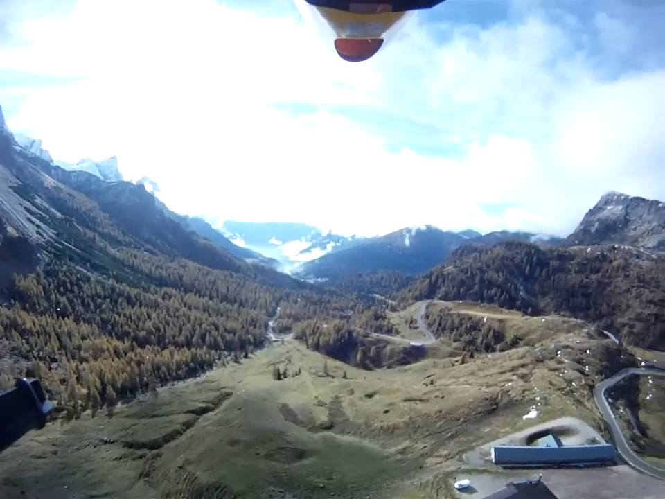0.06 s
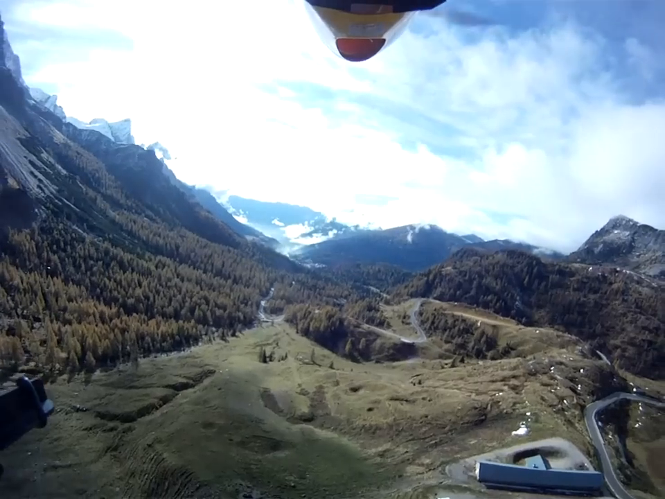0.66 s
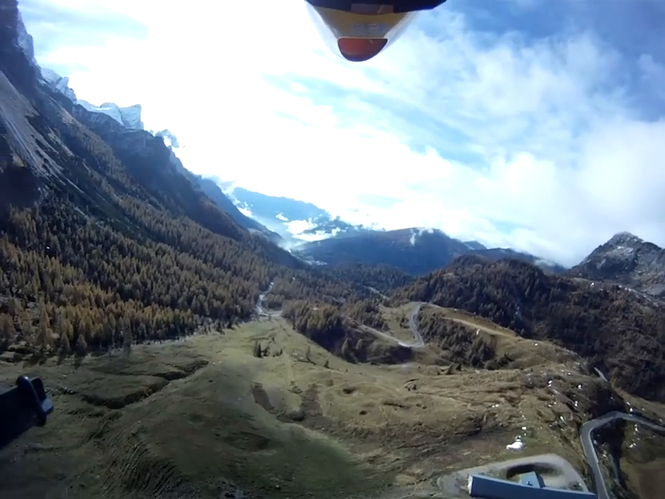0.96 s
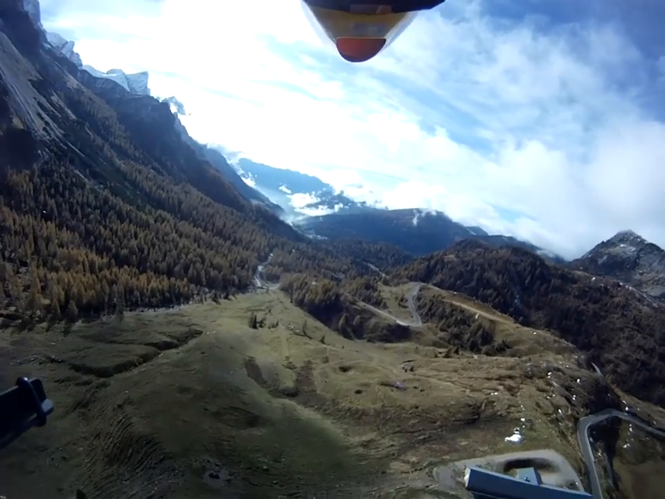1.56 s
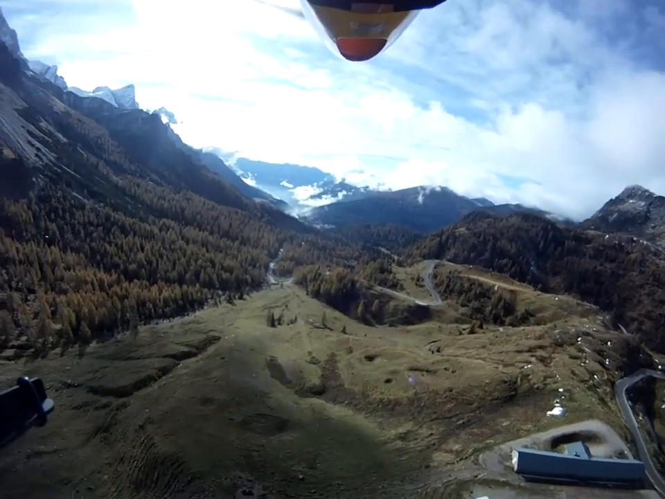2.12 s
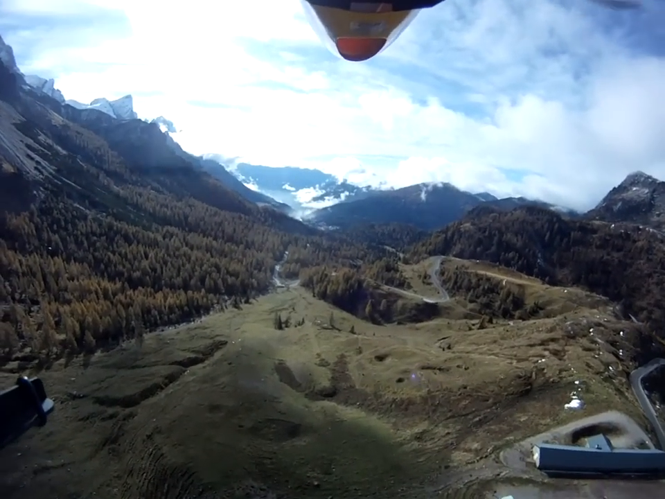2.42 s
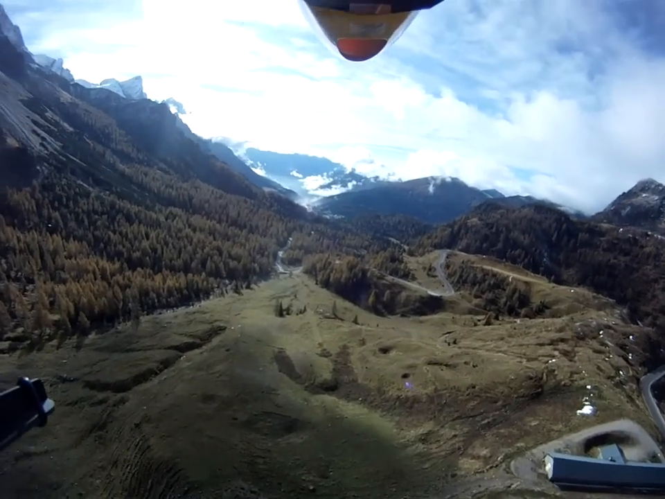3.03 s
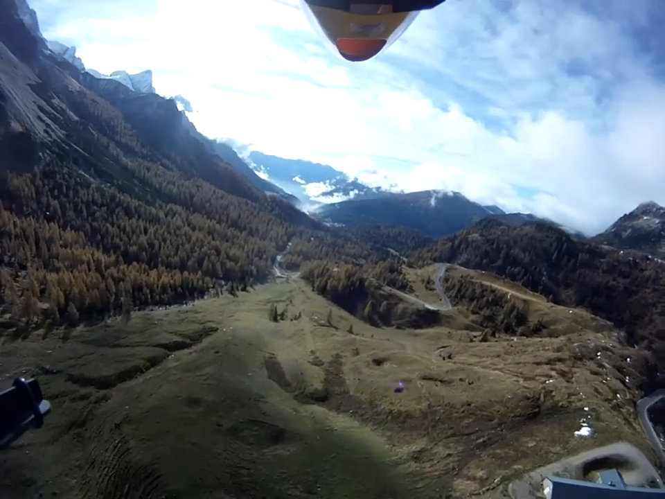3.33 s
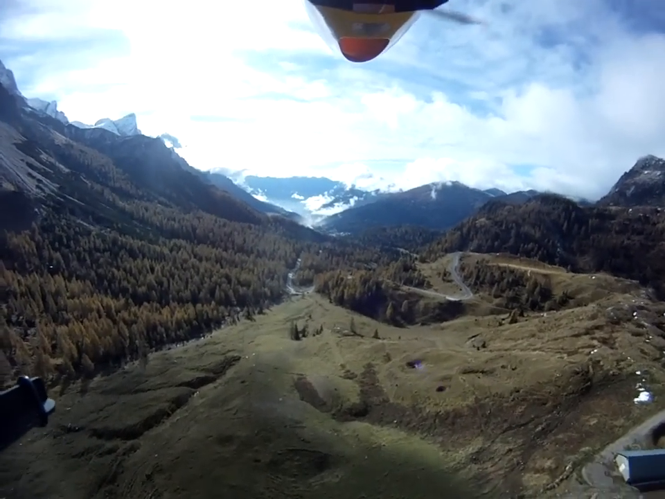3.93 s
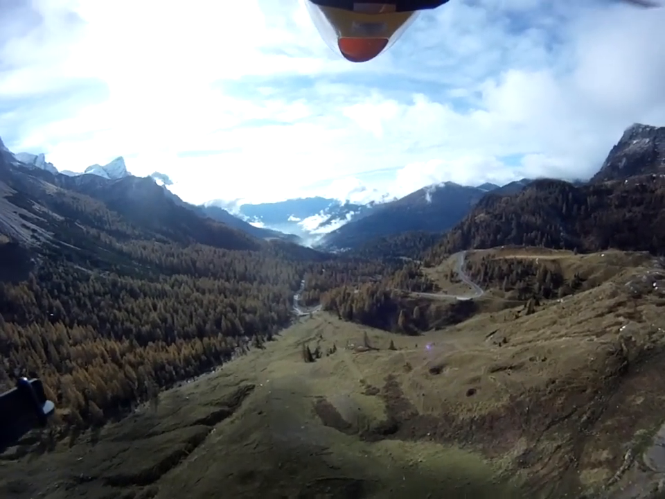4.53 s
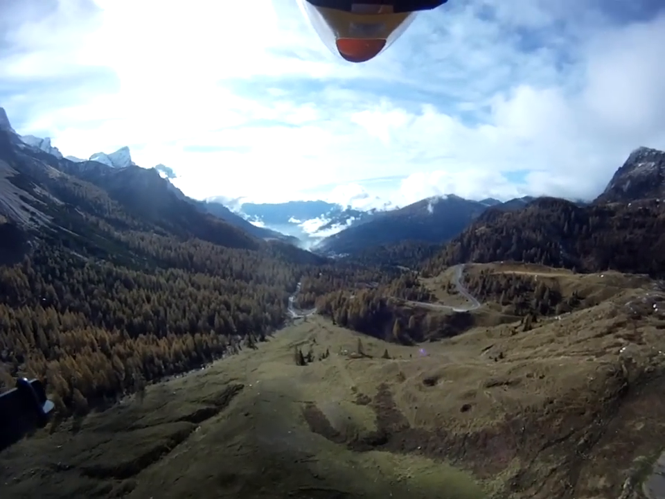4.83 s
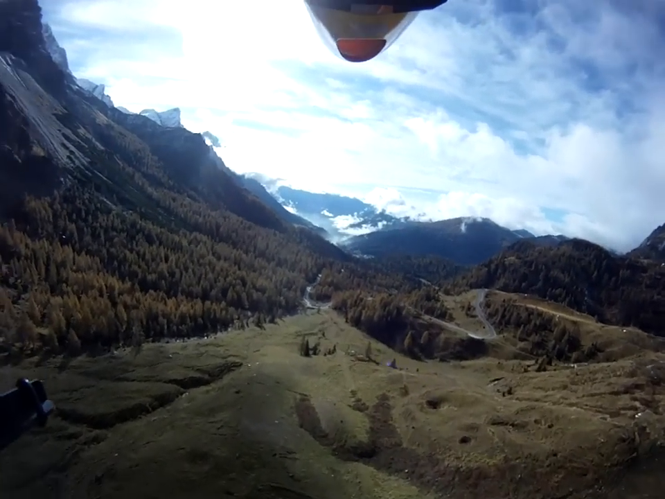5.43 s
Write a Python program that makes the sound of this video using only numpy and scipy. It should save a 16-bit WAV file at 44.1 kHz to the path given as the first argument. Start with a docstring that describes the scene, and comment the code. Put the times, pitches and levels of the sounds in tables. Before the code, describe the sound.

A model helicopter is in flight, heard very close from a small microphone mounted on its body, with no echo. From the first moment its two-stroke engine gives a loud, continuous buzz with a whining edge and a coarse exhaust rasp. Softer blade swish hisses around it, with a faint low rumble of rotor wash and a slight tail rotor drone, clearest around 1 second. The rasp is hardest near 0.75 seconds, then eases a little. The engine's pitch sags gradually by two to three semitones over the first 3.5 seconds, then holds nearly level. From about 2 seconds on, the main rotor shakes the buzz, giving it a fast, even flutter that stays. A thin, high fizz lies over everything throughout. The engine is still running at much the same loudness when the sound ends at about 5.7 seconds.

```python
"""A model helicopter in flight, heard from the microphone of a small camera on its own frame.
From the start the two-stroke engine buzzes close by, with exhaust rasp, blade swish and rotor wash around it.
It sags from 239 to about 207 turns a second; from two seconds on, the geared main rotor shakes the buzz.
Throughout, the camera's coarse sampling adds a thin fizz on top."""
import sys
import numpy as np
from scipy import signal
from scipy.fft import rfft, irfft
from scipy.io import wavfile

SR = 44100
rng = np.random.default_rng(int(sys.argv[2]) if len(sys.argv) > 2 else 0)


def wav_out(sig):
    """Save sig, one row per channel (or a flat mono array), as 16-bit PCM at SR to the path in sys.argv[1]."""
    wavfile.write(sys.argv[1], SR, np.round(np.clip(np.atleast_2d(sig).T, -1, 1) * 32767).astype(np.int16))


N = 250044
TIME, BINS = np.arange(N) / SR, np.fft.rfftfreq(N, 1 / SR)

# engine speed, one firing per turn: time_s, firing_hz
ENGINE_SPEED = [(0.0, 238.9), (0.35, 235.7), (0.55, 232.3), (1.0, 226.8), (1.4, 222.4), (1.95, 216.2),
                (2.25, 211.5), (2.5, 210.7), (2.9, 209.7), (3.3, 207.6), (3.55, 205.9), (4.05, 205.8),
                (4.35, 206.5), (5.0, 207.3), (5.67, 206.5)]


def exhaust_note(turns, fundamental_db=-15, overtone_trim_db=-0.33, smear=.37, flutter=.11):
    """The firing pulses buzz as twelve engine orders; each rotor turn sways their strength and timing."""
    firing_hz = curve(ENGINE_SPEED)
    gains = [gain_of(fundamental_db)]
    gains += [gain_of(overtone_trim_db) * exhaust_resonance(order * firing_hz) for order in range(2, 13)]
    sway = rotor_shake(turns, firing_hz)
    jitter_turns = .003 * drift(35)  # ignition comes a little early or late
    buzz = np.zeros(N)
    for order, gain in enumerate(gains, 1):
        # turbulent air blurs the higher orders most
        blur = 1 + flutter * min(order / 5, 1) * (drift(45) + 1j * drift(45))
        shaken = 1 + (sway if order == 1 else 0.53 * sway * np.exp(1j * order * 1.44))
        phase = order * (turns + jitter_turns) - smear * order ** 2 / 2  # the muffler smears each pulse
        buzz += gain * (blur * shaken * np.exp(2j * np.pi * phase)).real
    return np.sqrt(2) * buzz


def exhaust_resonance(hz):
    """Gain of muffler and tuned pipe at this frequency: their resonances add in power."""
    # muffler resonances that the low orders slide through: centre_hz, half_width_hz, level_db
    muffler = [(408, 36, -37.6), (477, 14, -37.5), (622, 42, -34.7), (716, 22, -35.5), (838, 34, -27.5),
               (869, 30, -22.2), (953, 15, -25.5), (1053, 35, -23.8), (1122, 24, -24), (1163, 25, -20),
               (1197, 14, -27)]
    # tuned pipe resonances that make the high orders whine: centre_hz, half_width_hz, level_db
    pipe = [(1234, 22, -33.5), (1362, 24, -31), (1428, 18, -31), (1465, 34, -26.5), (1590, 24, -28),
            (1688, 38, -21.3), (1745, 28, -26), (1803, 30, -23.3), (1855, 22, -35), (1965, 45, -30.5),
            (2150, 400, -39.5)]
    grid_hz = np.arange(6000.)
    power = sum(gain_of(db) ** 2 / (1 + ((grid_hz - centre) / width) ** 2) ** 3
                for centre, width, db in muffler + pipe)
    return np.interp(hz, grid_hz, np.sqrt(power))


def rotor_shake(turns, firing_hz, fast_depth=0.047, slow_depth=0.48, onset_hz=210.3, width_hz=2.2):
    """The main rotor shakes the frame harder as the engine slows past onset_hz."""
    rotor = rotor_angle(turns)
    # the real part sways strength, the imaginary part timing
    sway = np.cos(rotor) - 0.78j * np.sin(rotor - 0.71) + 0.084 * np.exp(-2j * rotor)
    depth = fast_depth + (slow_depth - fast_depth) / (1 + np.exp((firing_hz - onset_hz) / width_hz))
    return sway * depth * (1 + 0.21 * drift(15))


def exhaust_rasp(turns, base_db=-17.5, echo=0.22, edge_hz=1950):
    """A puff of gas at each firing echoes in the tuned pipe one engine turn later."""
    # spectrum of the rasp: frequency_hz, relative_db
    rasp_spectrum = [(30, -34), (300, -23.5), (520, -22), (750, -20), (860, -6.5), (950, -7), (1080, -1.5),
                     (1330, -9), (1520, -2.5), (1700, 2.5), (1910, -1), (2200, -10), (2600, -14.5),
                     (3050, -23.5), (3400, -34), (3900, -45)]
    gas = rng.standard_normal(N)
    earlier = [np.interp(turns - k, turns, np.arange(N)).round().astype(int) for k in range(4)]
    piped = sum(echo ** k * gas[at] * (at > 0) for k, at in enumerate(earlier))
    chop = 1 + 0.075 * np.cos(2 * rotor_angle(turns))  # each blade sweeps over the outlet
    puffs = 1 + 0.18 * np.cos(2 * np.pi * turns)
    rasp = coloured(piped * chop * puffs, rasp_spectrum)
    effort_db = engine_effort()
    edge = irfft(rfft(rasp) / (1 + (edge_hz / (BINS + 1)) ** 12), N)  # treble grows with hard running
    rasp += edge * (gain_of(1.2 * (effort_db - effort_db.mean())) - 1)
    return gain_of(base_db + effort_db) * rasp


def blade_swish(turns, base_db=-36.5, spit_turns=0.13):
    """Hiss swells as each of the two blades passes, and spits briefly at every firing."""
    # spectrum of the swish inside the camera case: frequency_hz, relative_db
    swish_spectrum = [(2400, -22.5), (3130, -5.5), (3380, 1.5), (3580, -4), (3760, -3), (4130, -14),
                      (4560, -4.5), (4930, -3.5), (5220, -16), (5480, -10), (5750, -18.5), (6000, -24)]
    rotor = rotor_angle(turns)
    swell = np.exp(0.28 * np.cos(2 * rotor) + 0.095 * np.cos(rotor) + 0.11 * drift(36))
    spit = 1 + 0.66 * np.exp(-(turns % 1) / spit_turns + .5 * drift(100))
    hiss = coloured(rng.standard_normal(N) * swell * spit, swish_spectrum)
    return gain_of(base_db + 1.37 * engine_effort()) * hiss


def rotor_rumble(turns, tail_gear=.472, wash_db=-36):
    """The main blades thump as they pass, the tail rotor drones, and turbulent wash hits the case."""
    # thump of the main blades: time_s, level_db
    thump_levels = [(0, -42), (.25, -40.5), (.5, -47), (1.4, -56), (2.05, -40.5), (2.25, -55), (3, -49),
                    (5.67, -51)]
    # drone of the tail rotor: time_s, level_db
    drone_levels = [(0, -37), (.75, -31.7), (1.4, -35), (2.05, -43.5), (2.2, -51), (3, -51.5),
                    (5.67, -45.5)]
    # spectrum of the wash at the microphone: frequency_hz, relative_db
    wash_spectrum = [(22, -38), (50, -24), (80, -7), (140, -4), (185, 6.5), (240, 6), (290, -8),
                     (420, -23.5), (800, -49)]
    thump = np.cos(2 * rotor_angle(turns) + 0.53 * drift(6.9)) * (1 + 0.44 * drift(4.6))
    drone = np.cos(2 * np.pi * tail_gear * turns + 0.12 * drift(2.4)) * (1 + 0.25 * drift(17))
    wash = coloured(rng.standard_normal(N), wash_spectrum)
    return (gain_of(curve(thump_levels)) * evened(thump)
            + gain_of(curve(drone_levels)) * evened(drone)
            + gain_of(wash_db) * wash)


def engine_effort(dip_s=0.499, dip_width_s=0.011, dip_db=-3.6):
    """How hard the engine works, in dB, with one brief dip; rasp and swish follow it."""
    # slow course of the effort: time_s, effort_db
    effort = [(0, -1), (.3, -0.4), (.75, 1), (1.4, 0.33), (2.1, -0.94), (2.5, -2), (4.4, -2.5),
              (5.67, -2.5)]
    return curve(effort) + dip_db * np.exp(-((TIME - dip_s) / dip_width_s) ** 2)


def rotor_angle(turns, gear=.1218, start_turns=.45):
    """The main rotor follows the crankshaft through its gear, in radians."""
    return 2 * np.pi * (start_turns + gear * turns)


def gain_of(db):
    """Decibels to a factor."""
    return 10 ** (np.asarray(db) / 20)


def evened(x):
    """Scales to rms 1."""
    return x / np.sqrt(np.mean(x ** 2) + 1e-20)


def curve(rows):
    """Rows of time and value as a value for every sample."""
    return np.interp(TIME, *np.transpose(rows))


def coloured(x, spectrum):
    """Filters x by the spectrum, at rms 1."""
    hz, db = np.transpose(spectrum)
    response = gain_of(np.interp(np.log(BINS + 1), np.log(hz), db))
    return evened(irfft(rfft(x) * response, N))


def drift(rate_hz):
    """Random wavering, mostly slower than rate_hz, at rms 1."""
    return evened(irfft(rfft(rng.standard_normal(N)) / (1 + (BINS / rate_hz) ** 2), N))


def scene(fade_s=.002):
    """One crankshaft drives engine and rotors, all at arm's length or less from the microphone."""
    turns = np.cumsum(curve(ENGINE_SPEED)) / SR
    helicopter = exhaust_note(turns) + exhaust_rasp(turns) + blade_swish(turns) + rotor_rumble(turns)
    from_end_s = np.minimum(TIME, TIME[::-1])
    fade = np.sin(np.pi / 2 * np.minimum(from_end_s / fade_s, 1)) ** 2
    return (fade * helicopter)[None]


def record(dry, hold_hz=12000, cutoff_hz=15220):
    """The camera holds each coarse sample, mirroring the sound around hold_hz, then cuts the top."""
    narrow = irfft(rfft(dry) * (BINS < hold_hz / 2), N)
    mirrored = narrow * (1 + 2 * np.cos(2 * np.pi * hold_hz * TIME))
    held = irfft(rfft(mirrored) * np.sinc(BINS / hold_hz), N)
    band_limit = signal.firwin(511, cutoff_hz, window=("kaiser", 9), fs=SR)
    return signal.oaconvolve(held, band_limit[None], "same")


dry = scene()
out = record(dry)
wav_out(out)
```